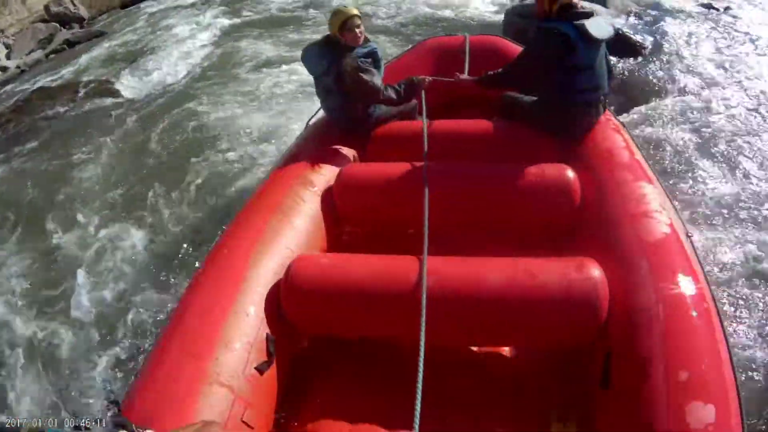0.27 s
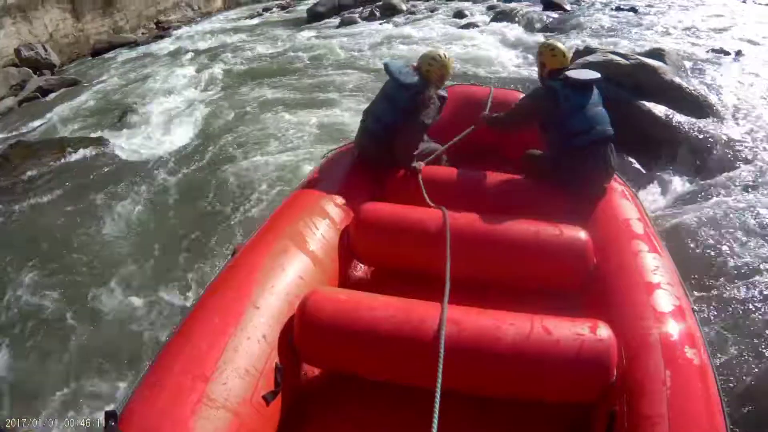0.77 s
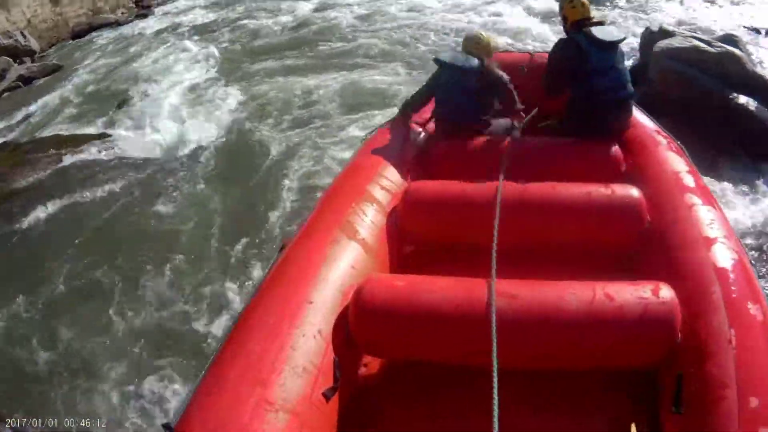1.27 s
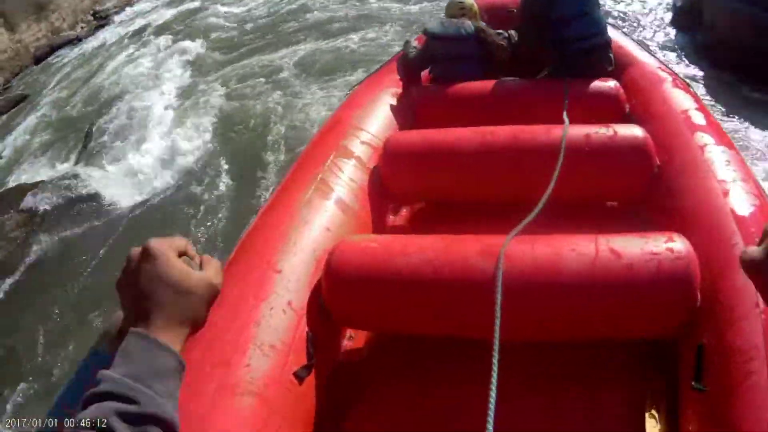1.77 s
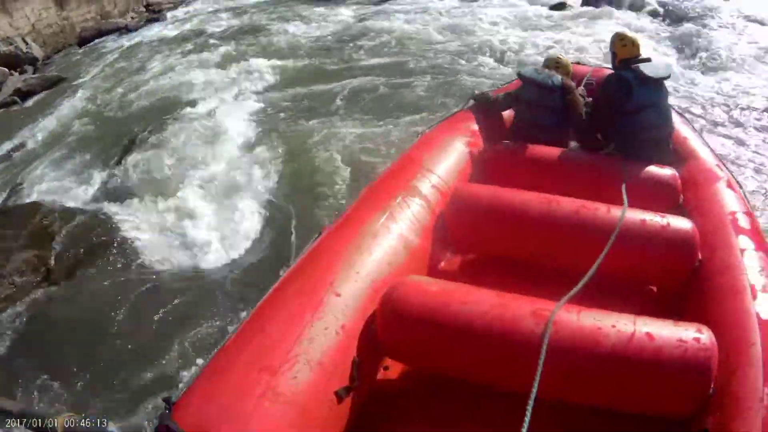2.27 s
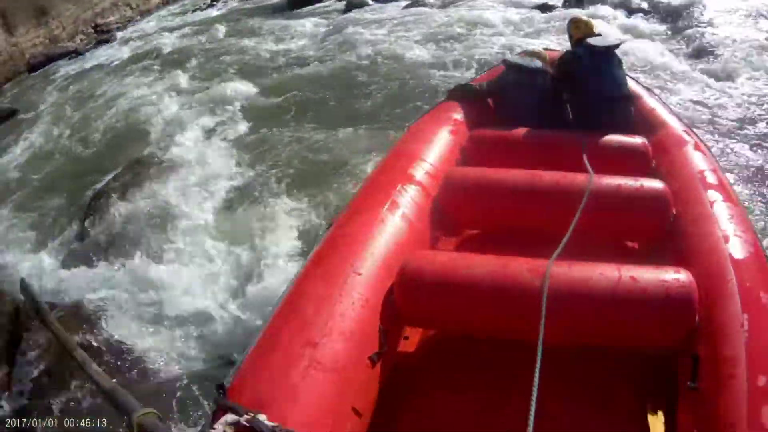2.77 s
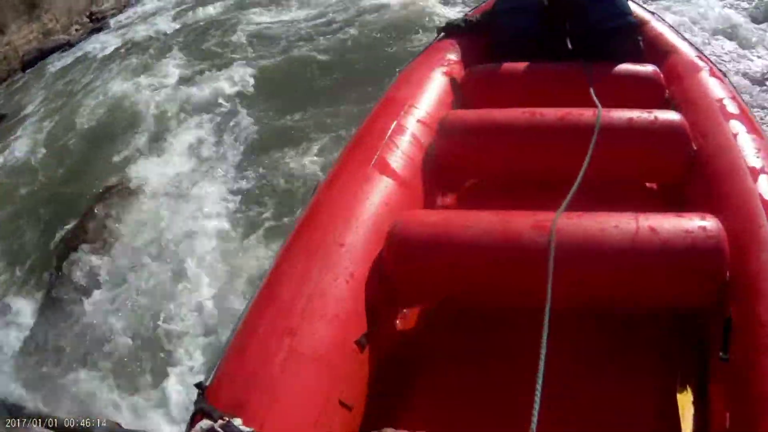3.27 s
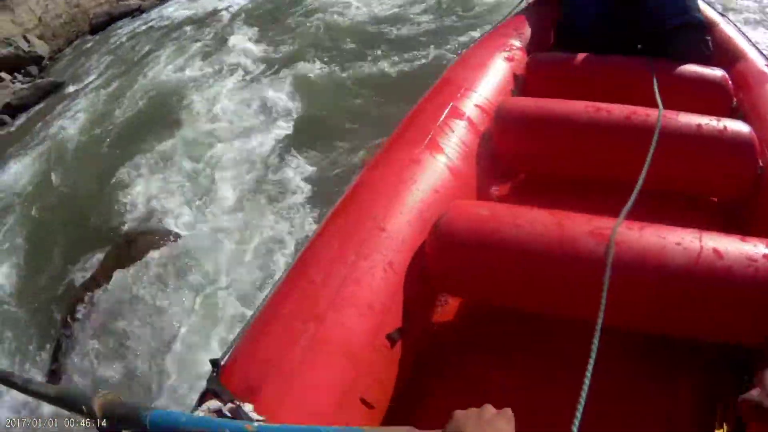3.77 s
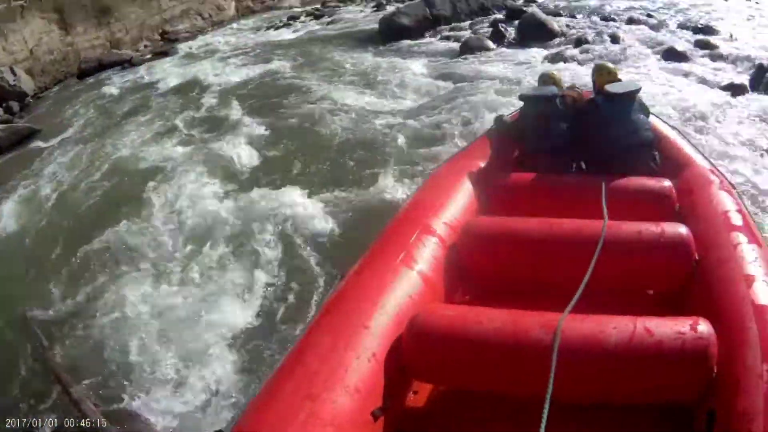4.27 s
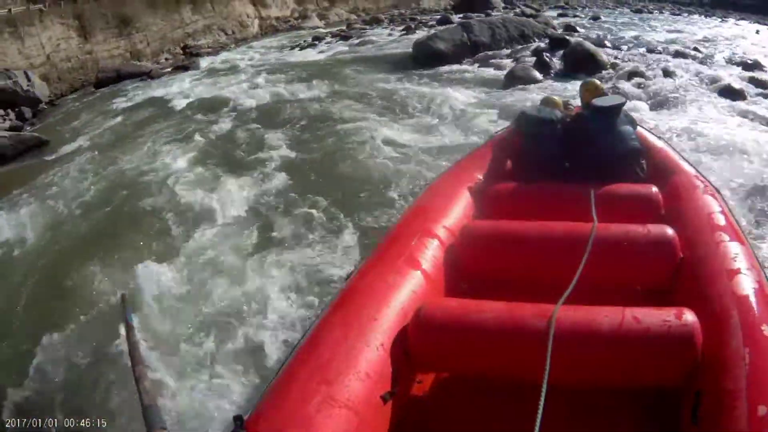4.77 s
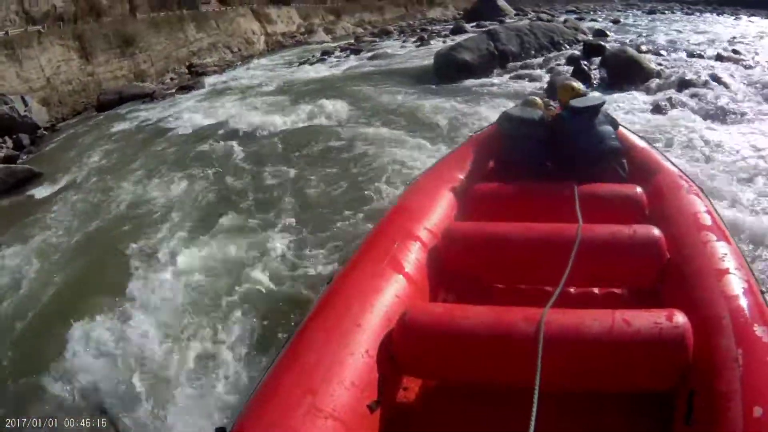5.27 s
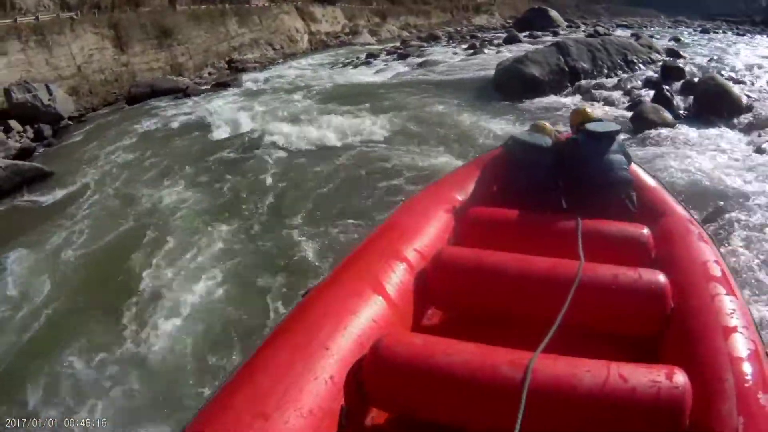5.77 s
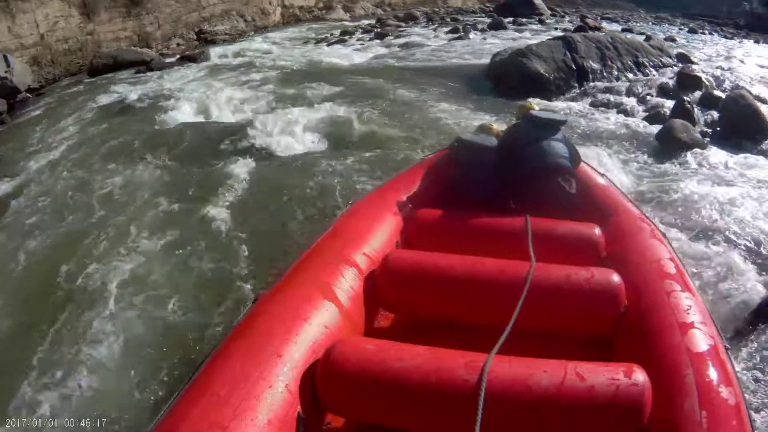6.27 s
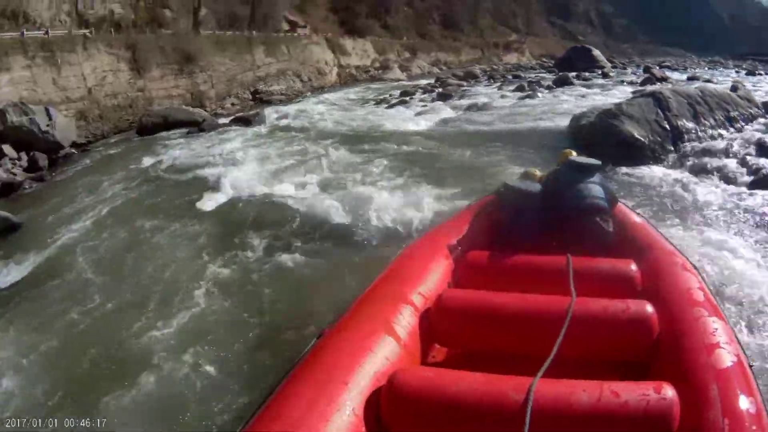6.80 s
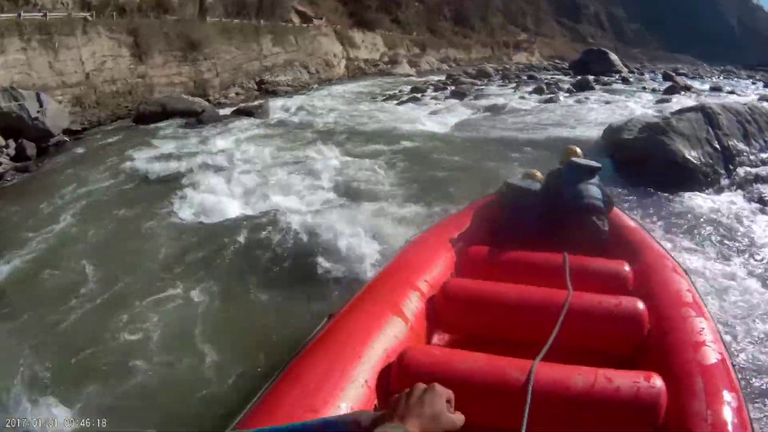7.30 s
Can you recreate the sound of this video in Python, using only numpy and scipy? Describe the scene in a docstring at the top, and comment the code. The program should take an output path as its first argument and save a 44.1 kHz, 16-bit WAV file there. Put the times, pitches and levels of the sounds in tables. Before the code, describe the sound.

Muffled river rapids rush on while a loose helmet camera mount bumps and rattles in bursts, with light plastic ticks.

```python
"""A river rapid, heard on a raft from a camera shut in a plastic case on a helmet mount.
White water roars as countless bubbles burst, dull and hollow through the case wall and its resonances.
As the wearer moves, the loose mount trembles and knocks against its stops, one way or the other,
and the camera chatters after each blow. A latch pings, light taps ring the case, plastic parts click."""
import sys
import numpy as np
from scipy import signal
from scipy.io import wavfile
from scipy.ndimage import uniform_filter1d

SR = 44100
rng = np.random.default_rng(int(sys.argv[2]) if len(sys.argv) > 2 else 0)


def waveform_to_disk(signal):
    """Save audio, clipped to [-1, 1], as 16-bit WAV at the path in sys.argv[1]."""
    frames = np.transpose(np.atleast_2d(signal))
    scaled = np.clip(frames, -1, 1) * 32767
    samples = np.round(scaled).astype(np.int16)
    wavfile.write(sys.argv[1], SR, samples)


N = 332514

# roar past waves and rocks: t/s, level/dB
ROAR_LEVELS = [(0.0, -50.5), (0.17, -49.5), (0.75, -48.5), (1.07, -50), (1.89, -49.5), (2.9, -47.5),
               (3.15, -49), (4.05, -50), (4.77, -48), (5.75, -49), (6.09, -49.5), (6.4, -49.5),
               (7.37, -49.5), (7.54, -48.5)]
# case wall transmission between resonances: f/Hz, relative level/dB
WALL_CURVE = [(25, -12), (60, -14.5), (200, -12.5), (550, -11.5), (950, -13.5), (1080, -17), (1900, -10.5),
              (2700, -21.5), (3200, -23.5), (4400, -22.5), (5500, -29), (8000, -35), (12000, -36.5),
              (15700, -46.5)]
# air and panel resonances: f/Hz, width/Hz, relative level/dB
RESONANCES = [(1312, 147, -0.5), (1614, 100, -7), (2208, 226, -6), (3674, 510, -14.5), (6510, 330, -31)]
# mount hits its stops: t/s, strength/dB, contact/ms, direction, optional rebound strength/dB
STOP_BLOWS = [(0.0001, -35, 1.4, 1), (0.1445, -22.5, 0.43, 1), (0.156, -31, 14, 1), (0.415, -32.5, 4.4, -1),
              (0.4981, -31.5, 8.6, -1), (0.5694, -27, 0.13, 1, -29), (0.5925, -29.5, 12, -1),
              (0.62, -29.5, 6.3, 1), (0.668, -36, 4.8, 1), (0.6755, -22.5, 2.6, -1, -25),
              (0.7668, -27.5, 0.53, 1), (0.7817, -34, 1.8, 1), (0.7935, -31, 5.8, 1), (0.857, -29, 4.3, -1),
              (0.9202, -35.5, 2.1, -1), (0.9305, -24.5, 15, -1), (0.9401, -30.5, 0.76, 1),
              (1.0311, -35, 11, 1), (1.0422, -27, 4.6, -1, -27), (1.1752, -24, 0.16, 1),
              (1.1837, -26, 1.5, 1), (1.28, -31, 9.9, -1), (1.3672, -28.5, 0.81, 1, -26),
              (1.4129, -24.5, 0.93, 1), (1.4222, -33, 16, 1), (2.6297, -34.5, 2.1, 1),
              (2.7293, -30.5, 7.6, -1, -33.8), (2.872, -28, 0.69, 1, -28), (2.897, -33, 0.49, 1),
              (2.905, -29, 1.2, 1), (2.969, -26.5, 0.5, 1, -32), (3.0729, -36.5, 0.77, 1),
              (3.094, -28, 9.7, 1), (3.1214, -34, 0.85, 1), (4.5664, -38, 12, 1),
              (4.578, -24, 3.9, -1, -30), (4.605, -37, 1, -1), (4.6536, -29, 0.1, 1), (4.81, -30, 6.7, -1),
              (4.8204, -21.5, 1.7, -1), (4.9003, -38.5, 2.6, 1), (5.0037, -34.5, 6.3, -1),
              (5.1376, -24.5, 0.18, 1), (5.206, -28, 11, 1), (5.2232, -32.5, 1.9, -1),
              (5.2428, -34, 6.3, 1), (5.362, -33, 0.62, 1, -31), (5.572, -39, 9, -1),
              (5.7279, -29.5, 1, -1), (5.8399, -32.5, 0.11, 1), (5.9718, -32, 6.7, -1),
              (6.0402, -19.5, 0.11, 1, -23), (6.0622, -26.5, 0.38, 1), (6.256, -36, 2.9, 1),
              (6.8574, -35.5, 5.5, -1), (7.467, -43, 4.7, 1)]
# mount swing: f/Hz, level/dB, t60/s, polarity
MOUNT_MODES = [(52, 2, 0.13, 1), (112, 0.5, 0.0042, -1), (154.2, -3.5, 0.079, 1), (254, -6.5, 0.051, 1),
               (301, -12.5, 0.088, 1), (362, -28, 0.04, 1)]
# case ring: f/Hz, level/dB, t60/s, polarity
CASE_MODES = [(467, -6.5, 0.011, 1), (550, -19.5, 0.1, 1), (788, 0, 0.0059, -1), (936, -11.5, 0.053, 1),
              (1294, -5.5, 0.031, 1), (1580, 3, 0.0097, 1), (2072, -5.5, 0.034, -1),
              (2336, -9.5, 0.026, -1)]
# wearer moves: start t/s, length/s, tremble level/dB
MOVE_BOUTS = [(0.0, .5, -60), (.6, 0.78, -55), (2.6, 0.43, -54.5), (4.455, .55, -58.5), (6.95, 0.71, -61.5)]
# latch pings: t/s, level/dB
LATCH_PINGS = [(0.0328, -41.5), (0.5032, -33.5), (2.726, -42), (4.8216, -39.5), (5.723, -37.5),
               (5.9757, -41), (6.9176, -40.5), (7.0498, -45)]
# light taps on the case: t/s, level/dB
CASE_TAPS = [(.5036, -30), (.5953, -29), (.706, -33), (.9295, -36), (1.179, -30), (1.188, -27),
             (1.3672, -31), (1.4125, -32), (2.8645, -31), (2.8692, -32), (4.8185, -35), (4.834, -36),
             (4.8605, -37), (5.224, -35), (5.7075, -34), (6.3114, -30)]
# plastic on plastic: t/s, level/dB
PLASTIC_CLICKS = [(0.5038, -42), (0.5763, -46), (0.5834, -44), (0.5895, -42.2), (0.6031, -42),
                  (0.6996, -36.5), (0.721, -43), (1.1853, -46.5), (2.7275, -39), (3.0716, -45),
                  (4.6504, -44), (4.8242, -42.8), (4.8309, -43.9), (4.8344, -43), (5.1514, -42),
                  (5.1576, -41), (5.2204, -42), (6.0494, -30), (6.0515, -31), (6.3109, -45)]
# clicking part: f/Hz, level/dB, t60/s, polarity
PART_MODES = [(3630, -1, 0.0094, 1), (4300, 1.5, 0.0085, -1), (4930, -3.5, 0.0054, 1),
              (5830, -12, 0.0074, -1)]
# wall's answer to a click: f/Hz, level/dB, t60/s, polarity
WALL_MODES = [(2120, 8.5, 0.0066, 1), (2750, -3, 0.0081, 1)]

RING_T_S = np.arange(6600) / SR  # time axis of mount and case modes
TICK_T_S = np.arange(1500) / SR  # time axis of pings and clicks
TICK_RISE = (1 - np.exp(-TICK_T_S / 0.00017)) ** 2


def amp(db):
    """Level in dB to gain."""
    return 10 ** (np.asarray(db) / 20)


def unit_rms(x):
    """Scale to rms 1."""
    return x / np.sqrt(np.mean(x ** 2) + 1e-20)


def add(mix, start_s, sound):
    """Mix a sound in at start_s."""
    part = mix[round(start_s * SR):][:len(sound)]
    part += sound[:len(part)]


def ring(modes, t=RING_T_S, wave=np.sin):
    """Impulse response: sum of decaying modes."""
    return sum(np.sign(polarity) * amp(db - 60 * t / t60_s) * wave(2 * np.pi * hz * t)
               for hz, db, t60_s, polarity in modes)


def river(splashes_per_s=600, swell_rms_db=0.72):
    """Countless bursting bubbles as noise; splashes stand out, the level wavers."""
    t = np.arange(N) / SR
    sizes = amp(3.6 * np.minimum(rng.exponential(1, N), 5))
    splashes = sizes * (rng.random(N) < splashes_per_s / SR) * rng.choice([-1, 1], N)
    burst = rng.standard_normal(256) * np.exp(-np.arange(256) / 40)
    roar = rng.standard_normal(N) + 0.3 * unit_rms(signal.oaconvolve(splashes, burst)[:N])
    rates_hz = np.geomspace(2, 30, num=30)[:, None]
    swells = np.sin(2 * np.pi * (rates_hz * t + rng.random(rates_hz.shape))) / np.sqrt(rates_hz)
    return roar * amp(swell_rms_db * unit_rms(swells.sum(axis=0)))


def through_case(roar, patch_rms_db=1.27):
    """Wall and resonances colour the roar; patches drift as waves break near and far."""
    hz, t, spectrum = signal.stft(roar, SR, nperseg=1024, noverlap=768)
    wall_hz, wall_db = np.transpose(WALL_CURVE)
    power = amp(np.interp(np.log(hz + 1), np.log(wall_hz + 1), wall_db)) ** 2
    power += sum(amp(db) ** 2 / (1 + (2 * (hz - centre_hz) / width_hz) ** 2) ** 2
                 for centre_hz, width_hz, db in RESONANCES)
    mid_band = (hz > 1100) & (hz < 4500)
    power /= power[mid_band].sum() / len(hz)  # roar levels refer to this band
    patches = uniform_filter1d(rng.standard_normal(spectrum.shape), size=12, axis=0)
    patches = unit_rms(uniform_filter1d(patches, size=12, axis=1))
    times_s, level_db = np.transpose(ROAR_LEVELS)
    sway_db = np.interp(t, times_s, level_db - level_db.mean())
    # a steady high hiss hardly follows the roar's sway
    sway_share = np.clip(1 - np.log2((hz + 1) / 4500), .3, 1)[:, None]
    gain = amp(level_db.mean() + sway_share * sway_db + patch_rms_db * patches)
    return signal.istft(spectrum * np.sqrt(power)[:, None] * gain, SR, nperseg=1024, noverlap=768)[1][:N]


def with_rebounds(delay_s=0.014, contact_ms=8.5):
    """All blows, plus a soft reverse one wherever the mount springs back."""
    rebounds = [(s + delay_s, rebound_db[0], contact_ms, -direction)
                for s, _, _, direction, *rebound_db in STOP_BLOWS if rebound_db]
    return [row[:4] for row in STOP_BLOWS] + rebounds


def knocks(blows, swing, spread_db=1.3):
    """Smooth pushes on the stops: short contact rings the case, long contact only swings the mount."""
    out = np.zeros(N)
    push_t_ms = 1000 * RING_T_S[1:600]
    for s, db, contact_ms, direction in blows:
        # where a blow lands decides which modes it favours
        modes = [(hz, mode_db + spread_db * rng.standard_normal(), t60_s, polarity)
                 for hz, mode_db, t60_s, polarity in CASE_MODES]
        push = np.sin(np.pi * np.minimum(push_t_ms / contact_ms, 1)) ** 2
        knock = signal.fftconvolve(swing + ring(modes), push / push.sum())
        add(out, s, np.sign(direction) * amp(db) * knock)
    return out


def chatter(blows, swing, case_ring, bounces_per_s=1200, t60_s=0.045):
    """Tiny dying bounces of the camera in its case after each blow; weaker after soft ones."""
    envelope = np.zeros(N)
    for s, db, contact_ms, _ in blows:
        add(envelope, s + .003, amp(db - 8.5 - 0.37 * contact_ms - 60 * RING_T_S / t60_s))
    bounces = envelope * rng.uniform(-1, 1, N) * (rng.random(N) < bounces_per_s / SR)
    response = signal.convolve(case_ring + 0.83 * swing, np.hanning(30) / 15)
    return signal.oaconvolve(bounces, response)[:N]


def tremble(swing, rest_db=-70, rise_db_per_s=83, fall_db_per_s=31):
    """Noise shakes the mount: faint at rest, rising into each bout of movement, then settling."""
    t = np.arange(N) / SR
    level_db = np.full(N, rest_db)
    for start_s, length_s, db in MOVE_BOUTS:
        before_s = np.maximum(start_s - t, 0)
        after_s = np.maximum(t - start_s - length_s, 0)
        level_db = np.maximum(level_db, db - rise_db_per_s * before_s - fall_db_per_s * after_s)
    response = signal.convolve(swing, np.hanning(300))
    shake = signal.oaconvolve(rng.standard_normal(N), response)[:N]
    return unit_rms(shake) * amp(level_db)


def latch_pings(hz=3267, t60_s=0.024):
    """The latch rings in one brief mode, slightly detuned each time."""
    out = np.zeros(N)
    for s, db in LATCH_PINGS:
        mode = (hz * rng.uniform(.98, 1.02), db, t60_s, 1)
        add(out, s, ring([mode], TICK_T_S) * TICK_RISE)
    return out


def case_taps(case_ring):
    """Light taps ring the case only."""
    out = np.zeros(N)
    for s, db in CASE_TAPS:
        add(out, s, amp(db) * case_ring / abs(case_ring).max())
    return out


def plastic_clicks(to_wall_db=-0.5):
    """Small hard parts ring briefly, never struck at quite the same spot; the wall answers."""
    out = np.zeros(N)
    wall = amp(to_wall_db) * ring(WALL_MODES, TICK_T_S)
    for s, db in PLASTIC_CLICKS:
        part = ring(PART_MODES, TICK_T_S * rng.uniform(.97, 1.03))
        add(out, s, amp(db) * (part + wall) * TICK_RISE)
    return out


def scene():
    """Water through the case; bumps dulled by the microphone's padding, ticks by the plastic."""
    water = through_case(river())
    swing = ring(MOUNT_MODES, wave=np.cos)  # felt as acceleration, so it starts at its peak
    case_ring = ring(CASE_MODES)
    blows = with_rebounds()
    bumps = knocks(blows, swing) + chatter(blows, swing, case_ring) + tremble(swing) + case_taps(case_ring)
    ticks = latch_pings() + plastic_clicks()
    padding = signal.butter(6, 2700, fs=SR, output="sos")
    plastic = signal.butter(3, 5600, fs=SR, output="sos")
    return (water + signal.sosfilt(padding, bumps) + signal.sosfilt(plastic, ticks))[None]


def record(dry, low_hz=34, top_hz=15660):
    """The microphone drops the lowest bass; a steep band limit follows."""
    thinned = signal.lfilter(*signal.butter(1, low_hz, "high", fs=SR), dry)
    band_limit = signal.firwin(511, top_hz, window=("kaiser", 9), fs=SR)
    return signal.oaconvolve(thinned, band_limit[None], "same")


dry = scene()
out = record(dry)
waveform_to_disk(out)
```